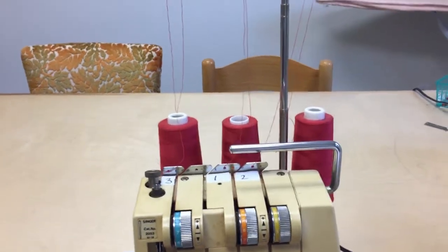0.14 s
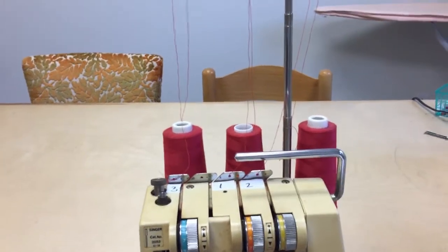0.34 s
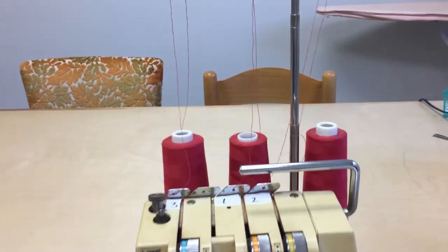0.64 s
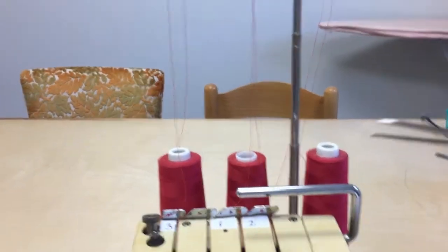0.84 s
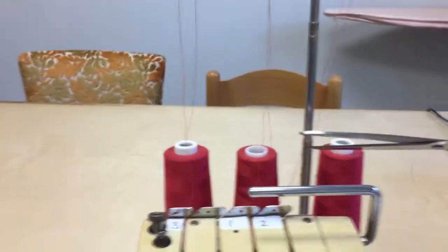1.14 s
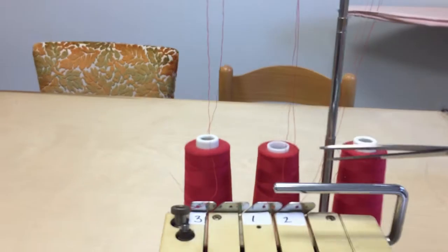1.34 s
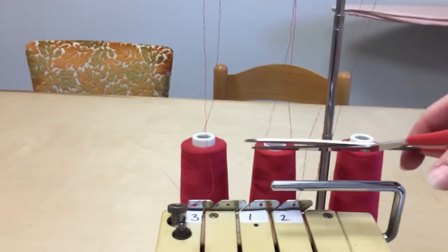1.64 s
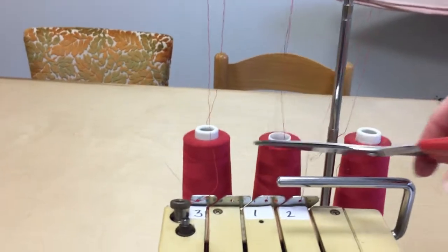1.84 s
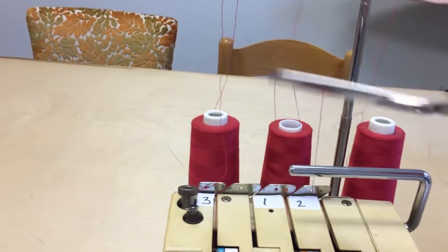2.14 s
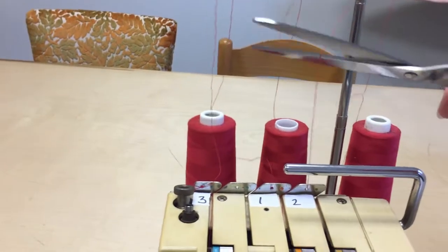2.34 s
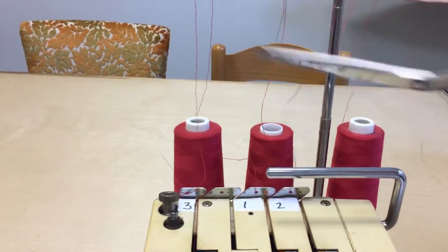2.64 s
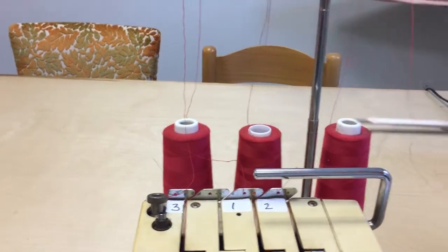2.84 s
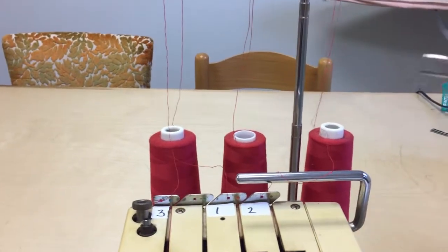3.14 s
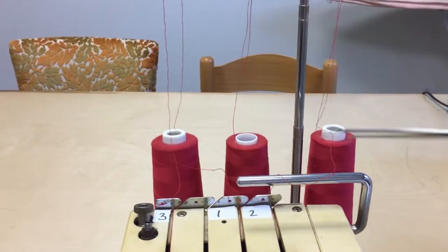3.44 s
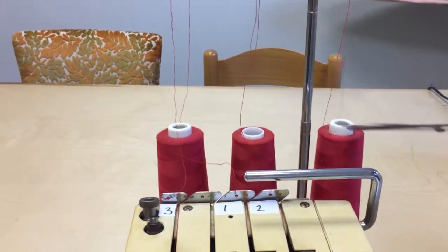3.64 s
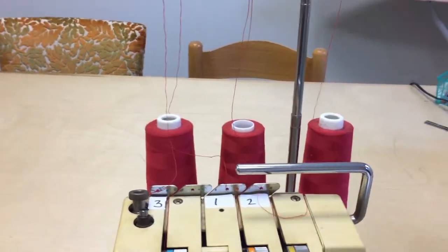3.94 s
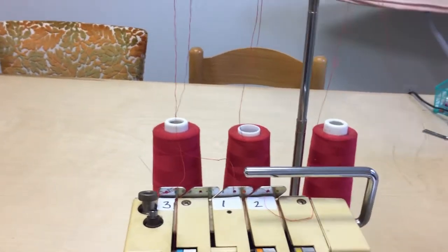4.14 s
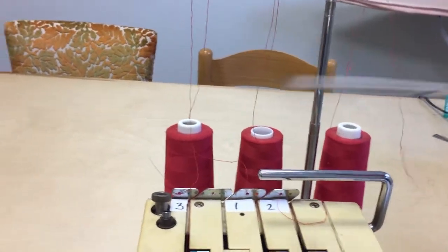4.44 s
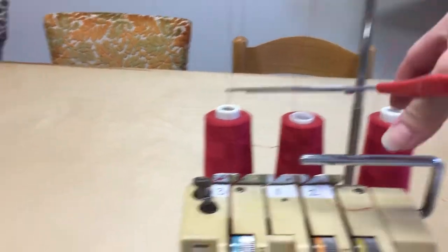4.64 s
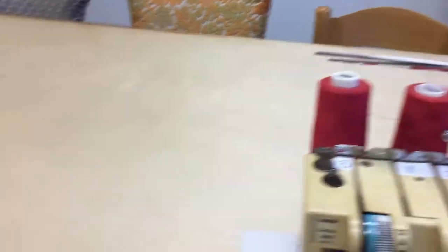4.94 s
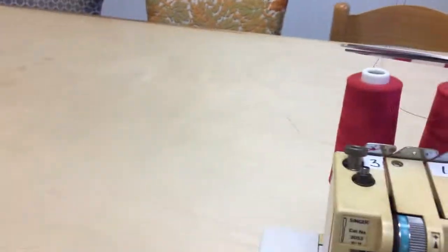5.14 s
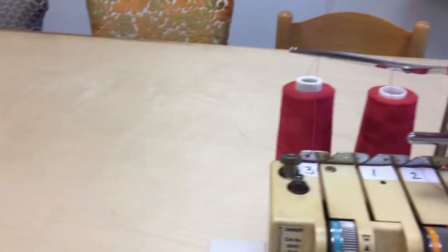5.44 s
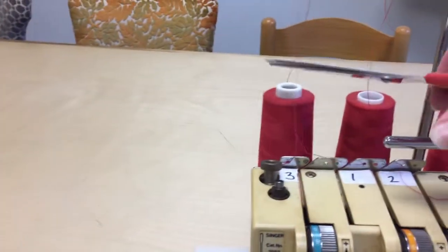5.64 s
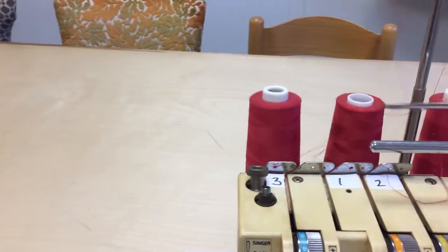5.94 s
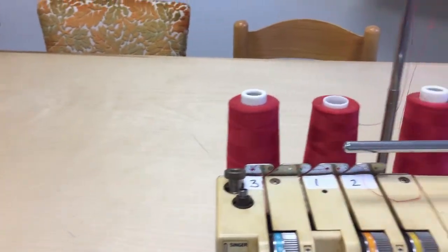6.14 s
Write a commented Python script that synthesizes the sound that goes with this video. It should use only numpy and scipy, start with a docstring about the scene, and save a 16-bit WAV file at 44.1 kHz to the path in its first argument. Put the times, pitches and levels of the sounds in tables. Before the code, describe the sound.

In a quiet, lightly echoing room, a low hum and uneven rumble run throughout. Cloth rustles briefly, scissors tick open, then dull wooden knocks sound farther off. Two crisp snips follow, their plastic grips snapping shut. The blades lightly strike a metal stand, pause, then snip more softly. A vehicle's low engine drone rises near the end, with dry plastic clacks. The microphone is close to the scissors.

```python
"""Steel scissors with plastic grips open and close on threads over a table in a quiet room.
Cloth rustles first: shaped noise. Blade ticks and rubbing ring the steel throughout; gliding noise is their song.
Something wooden is knocked from 1 to 2 s, while the hum sinks; the grips snap together from 2 to 3 s.
Near 4 s the blades strike the metal thread stand. From 5 s a vehicle (sines) draws near; at 6 s plastic clacks.
A humming appliance, a low rumble that comes and goes, and a faint steady noise of air lie under it all."""
import sys
import numpy as np
from scipy import signal
from scipy.fft import rfft, irfft
from scipy.io import wavfile

SR = 44100
rng = np.random.default_rng(int(sys.argv[2]) if len(sys.argv) > 2 else 0)


def int16_out(signal):
    """Quantize to a 16-bit WAV file."""
    q = np.round(np.clip(np.atleast_2d(signal).T, -1, 1) * 32767)
    wavfile.write(sys.argv[1], SR, q.astype(np.int16))


N = 277389

# blade ticks: t/s, force/dB, place of contact (0 pivot - 1 tips)
TICKS = [(0.376, -41, 0.525), (0.799, -30, 0.64), (0.811, -25.5, 0.62), (0.8233, -24.5, 0.73),
         (0.8282, -14.5, 0.89), (0.8505, -35.5, 0.555), (1.874, -31, 0.3), (1.935, -34, .1),
         (1.945, -39, 0.045), (2.102, -32, 0.81), (2.1061, -24, 0.74), (2.1187, -22.5, 0.79),
         (2.1646, -34.5, 0.58), (2.236, -36, 0.62), (2.269, -17.5, 0.812), (2.2747, -28, 0.26),
         (2.2934, -31, .03), (2.3105, -30, 0.95), (2.4205, -25, 0.75), (2.4252, -27, .75),
         (2.4304, -17, 0.88), (2.434, -12, 0.91), (2.4722, -37, .56), (2.687, -34, 0.61),
         (2.7135, -39, 0.73), (2.725, -40.5, .7), (2.7365, -18, 0.766), (2.745, -30.5, 0.76),
         (2.76, -23, 0.77), (2.903, -42.5, 0.11), (2.923, -27, 0.8), (2.935, -20, 0.85),
         (2.9436, -20.5, 0.82), (2.9748, -38, 0.61), (3.651, -44, 0.036), (3.7741, -32, 0.39),
         (3.7881, -38, 0.31), (3.8125, -30, .08), (3.824, -38, 0.05), (3.829, -34.5, 0.573),
         (3.959, -42, 0.47), (3.968, -30, 0.56), (3.9739, -27, 0.57), (3.9843, -25, 0.7),
         (3.988, -18, 0.84), (4.0217, -37, 0.53), (4.2171, -43, 0.56), (5.2235, -42, .03),
         (5.2498, -48, .03), (5.269, -49.5, .03), (5.296, -45.5, .03), (5.3105, -44, .03),
         (5.399, -26, 0.3), (5.411, -38, 0.43), (5.419, -32, 0.24), (5.4302, -30.5, 0.71),
         (5.525, -27, 0.37), (5.539, -33.5, 0.25), (5.554, -46, .03), (5.557, -40, .9),
         (5.5633, -35.5, 0.033), (5.573, -46, .03), (5.6545, -36, 0.058), (5.673, -20, .9),
         (5.6842, -22.5, 0.85), (5.6893, -22, 0.83), (5.7614, -28.5, 0.385), (5.7718, -33, 0.34),
         (5.7939, -32.5, 0.034)]
# ringing tones of the scissors: f/Hz, relative level/dB, time to fall 60 dB/s
SCISSORS_MODES = [(1452, -15.5, 0.015), (2055, -0.5, 0.019), (2235, -1, 0.01566), (2519, -8.5, 0.017),
                  (3650, -14.5, 0.012), (4004, -11, 0.0081), (5832, -6.5, 0.007), (6410, -3.5, 0.01036),
                  (7250, -9.5, 0.005), (9130, -4, 0.013), (11770, -14, 0.0048), (13800, -8, 0.007),
                  (15900, 0.5, 0.0051)]
# parts of the steel: low f/Hz, high f/Hz, place (0-1), tick loss over the whole blade/dB,
# level heard bare/dB, slips per s, how much sliding rings the modes/dB
STEEL_PARTS = [(1150, 4056, 0, 27.5, -18, 800, -1), (3100, 7900, 0.54, 39.5, -5, 1400, -0.5),
               (7700, 21300, 0.93, 29, -2.5, 1800, -14)]
# blades open: parting t/s, slide crest before it/s, slide length/s, pivot level/dB, edge level/dB,
# song before/dB, song after/dB, ring level/dB
OPENINGS = [(0.821, 0.013, 0.11, -63.5, -63, -57, -49.5, -57.5),
            (2.12, 0.011, 0.0504, -58, -46.5, -59, -70, -72),
            (2.433, 0.0057, 0.074, -59.5, -48, -58, -60, -63),
            (2.942, 0.01716, 0.05, -60.5, -47, -80, -61, -69.5),
            (3.986, 0.0024, 0.072, -61.5, -50, -77, -61, -61),
            (5.425, 0.018, 0.044, -66.5, -54.5, -62, -89, -83),
            (5.692, 0.017, 0.07, -62.5, -58, -70, -86, -70.5)]
# blades close: song start t/s, slide crest after it/s, slide length/s, pivot level/dB, edge level/dB,
# song length/s, song level/dB
CLOSINGS = [(1.936, 0.01545, 0.046, -61.5, -63, 0.0236, -65),
            (2.268, 0.028, 0.078, -60, -53.5, 0.0233, -53),
            (2.733, 0.036, 0.075, -59.5, -52, 0.0275, -49.5),
            (3.793, 0.031, 0.087, -63.5, -58.5, 0.033, -79), (5.223, 0.075, 0.12, -74, -98, 0.077, -80),
            (5.522, 0.042, 0.1, -68, -59, 0.036, -64), (5.754, 0.045, 0.11, -67.5, -61.5, 0.036, -65)]
# plastic grips meet: t/s, force/dB
SNAPS = [(1.974, -40), (2.3196, -13), (2.7811, -12)]
# blades strike the stand: t/s, drive level/dB, relative treble/dB, contact falls 60 dB in/s
STRIKES = [(3.8275, -45, -7, 0.023), (3.852, -49, 15.5, 0.02), (3.857, -41.5, 13.5, 0.0112),
           (3.8605, -33, -9, 0.0161), (3.867, -38, -18, 0.016), (3.902, -52, -12, 0.035)]
# ringing tones of the metal stand: f/Hz, relative level/dB, time to fall 60 dB/s
STAND_MODES = [(479, -15, 0.19), (575, -9.5, 0.077), (707, -5.5, 0.16), (1120, -2, 0.057),
               (1397, -4, 0.099), (1530, 6.5, 0.016), (1780, 1, 0.0086), (2227, -2.5, 0.062),
               (2620, -0.5, 0.018), (4000, 0.5, 0.039), (4950, -8.5, 0.0293), (6040, -20, 0.398),
               (7320, -2, 0.027), (12720, -4, 0.048), (14690, -23, 0.104)]
# dry clacks on a plastic housing: t/s, drive level/dB, relative treble/dB, contact falls 60 dB in/s
CLACKS = [(.105, -65, 11, 0.0094), (6.072, -44.5, -11, 0.51), (6.158, -37, -8.5, 0.015),
          (6.169, -28.5, -1, 0.015), (6.185, -48, 3, 0.21), (6.245, -42, -11, 0.074),
          (6.263, -33.5, -0.5, 0.025)]
# ringing tones of the plastic housing: f/Hz, relative level/dB, time to fall 60 dB/s
HOUSING_MODES = [(1110, -6, 0.012), (1530, 3.5, 0.0042), (2250, -4, 0.014), (3220, -3, 0.011),
                 (3780, -6, 0.011), (4540, 1, 0.0098), (5720, 2, 0.0088), (6900, 1.5, 0.0054)]
# dull knocks: t/s, drive level/dB, relative treble/dB, contact falls 60 dB in/s, push on the floor/dB
KNOCKS = [(1.058, -47, -22, 0.068, -50), (1.069, -26, -0.5, 0.033, -32), (1.0924, -30, -1, 0.0027, -57.5),
          (1.098, -40.5, 1, 0.43, -67), (1.379, -47, -16, 0.067, -66.5), (1.391, -27.5, -15, 0.03, -36.5),
          (1.405, -36, 1, 0.0069, -71), (1.5, -41, -18, 0.0056, -40), (1.544, -52.5, -13, 0.0134, -56),
          (1.723, -39.5, 0, 0.042, -59), (1.736, -46.5, 9.5, 0.25, -60)]
# ringing tones of the wood: f/Hz, relative level/dB, time to fall 60 dB/s
WOOD_MODES = [(382, -6.5, 0.0866), (524, 1.5, 0.031), (609, -0.5, 0.022), (720, -6, 0.015),
              (900, -4, 0.006), (1250, 5, 0.007), (1770, 1.5, 0.00512), (3250, -13, 0.0032)]
# low tones of the floor: f/Hz, relative level/dB, time to fall 60 dB/s
FLOOR_MODES = [(73, -8, 0.15), (215, 6, 0.0407)]
# cloth scuffs: crest t/s, body level/dB, treble level/dB, body swell/dB per s, body fade/dB per s
SCUFFS = [(.012, -63.5, -93.5, 299, 110), (.11, -64.5, -80, 1500, 79), (.17, -68.5, -91, 198, 400),
          (0.274, -51, -55.5, 501, 124), (0.337, -56.5, -70.5, 300, 301), (0.414, -75, -84, 400, 252)]
# colour of the cloth noise: f/Hz, relative level/dB per Hz
CLOTH_SPECTRUM = [(280, -27), (398, 2), (498, -11), (601, -3), (835, -24), (929, -3), (1120, -3.5),
                  (1450, -10.5), (1860, -2.5), (2250, -12), (2650, -8), (3500, -21), (4500, -19),
                  (5100, -27), (11000, -120)]
# engine loudness as the vehicle nears: t/s, level/dB
NEARING = [(4.95, -95), (5.3, -57.5), (5.63, -49.5), (5.8, -43), (6.0, -43.5), (6.15, -40.5), (6.29, -46)]
# engine tones: multiple of the firing rate, relative level idling/dB, relative level pulling/dB
ENGINE_ORDERS = [(1, -0.5, -16.5), (2, -22, 2.5), (3, -3.5, -14.5)]
# the hum sinks for a moment: t/s, change in level/dB
HUM_DIP = [(1.08, -1), (1.16, -11), (1.74, -8.5), (1.84, 1)]
# narrow wavering tones of the hum: f/Hz, width/Hz, level/dB
HUM_TONES = [(120.2, 15, -63), (260.8, 5.26, -70.5), (768, 4.3, -84)]
# loudness of the low rumble: t/s, level/dB
RUMBLE = [(0.0, -56), (0.49, -56.5), (1.21, -68.5), (2.05, -51.5), (3.71, -72), (4.01, -54), (4.2, -67),
          (5.32, -53.5), (5.46, -56.5), (6.29, -45.5)]
# colour of the low rumble: f/Hz, relative level/dB per Hz
RUMBLE_SPECTRUM = [(15, -71), (25, -64), (54, -10), (81, 3.5), (127, -6), (221, -13), (250, -9),
                   (320, -23.5), (550, -120)]
# colour of the air noise: f/Hz, relative level/dB per Hz
AIR_SPECTRUM = [(76, -31.5), (130, -6.5), (147, -19.5), (228, -22), (263, -32), (291, -25.5), (410, -28.5),
                (706, -34.5), (1100, -37.5), (2090, -39.5), (16000, -54)]
# how long the room rings: f/Hz, time to fall 60 dB/s
ROOM = [(100, 0.37), (700, 0.56), (1840, 0.2333), (4850, 0.22), (12000, 0.19)]

TICK_T60_S, TICK_RISE_S = 0.0039, 0.0008
TICK_VARIES_DB = 4.5   # each tick strikes each mode more or less
CLICK_DB = 8   # the hard first instant of a tick is what rings the modes
OPENING_BUILD, CLOSING_BUILD = 0.4444, 0.71   # share of a slide before its crest
MIDDLE_DB = -9   # mid-blade, relative to the mean of pivot and edge levels
SNAP_LOW_HZ, SNAP_HIGH_HZ = 650, 8900
SNAP_T60_S, SNAP_TAIL_DB = .008, 13.5   # the tail is set this far below the first click
# the free blade sings: pitch when shut, when parting and when wide open
SHUT_HZ, PARTING_HZ, OPEN_HZ = 15800, 9080, 7300
BEFORE_S, AFTER_S = 0.015, 0.025   # song time on each side of the parting
LEAD_S, LEAD_DB = .035, 17   # a lower song, fainter by LEAD_DB, leads into each closing
RING_HZ, RING_WIDTH_HZ, RING_T60_S = 9350, 1100, .3   # rough ring after parting
FIRST_TOUCH_DB = -17.5   # a 10 ms blow starts with a hard instant; longer contacts start softer
BOOM_LAG_S = 0.00624
TREBLE_STEEPER = 3.1   # cloth treble swells and fades this much faster than its body
IDLE_HZ, PULL_HZ, REV_HZ_PER_S = 58.7, 61.9, 11.7   # the engine idles, pulls, then keeps rising
PULL_S, PULL_TAKES_S = 5.68, 0.107
MAINS_HZ, MAINS_DB, MAINS_WAVERS_DB = 120.15, -56.5, 2   # the core of the hum
AIR_DB = -64.5
STOP_HZ = 16450   # from here up the cut is at least 70 dB


def scissors():
    """Ticks and rubbing drive three parts of the steel, heard partly bare and partly through ringing modes."""
    s, force_db, place = np.transpose(TICKS)
    varies_db = TICK_VARIES_DB * rng.standard_normal((len(s), len(SCISSORS_MODES)))
    humps, part_slide_db = slides()
    grip = from_db(4.5 * lumps(73) - 3.0)   # the edges stick and slip
    out = grip_snaps()
    for row, slide_db in zip(STEEL_PARTS, part_slide_db):
        low, high, part, loss_db, bare_db, slips, rings_db = row
        friction = from_db(slide_db) @ humps * grip * grains(slips, 2.3)
        friction *= np.sqrt(SR / (high - low))   # makes up for the narrow band
        tick_db = force_db - loss_db * np.abs(place - part)   # weaker away from the contact
        force = bursts(s, tick_db, TICK_T60_S, TICK_RISE_S) + friction
        rung = 0
        for (hz, db, t60), own_db in zip(SCISSORS_MODES, varies_db.T):
            if low <= hz < high:
                push = clicks(s, tick_db + own_db + CLICK_DB) + from_db(rings_db) * friction
                rung = rung + from_db(db - 20) * ring(push, hz, t60)
        bare = band(band(force, low, high), low, high)
        out = out + from_db(bare_db) * bare + band(rung, 0.97 * low, 16600)
    return out + singing_blades()


def slides():
    """Each opening or closing rubs the edges: pressure rises to a crest and falls; levels for three parts."""
    rows = [(s - lead, length, pivot, edge, OPENING_BUILD) for s, lead, length, pivot, edge, *_ in OPENINGS]
    rows += [(s + lag, length, pivot, edge, CLOSING_BUILD) for s, lag, length, pivot, edge, *_ in CLOSINGS]
    t = np.arange(N) / SR
    humps = np.array([np.interp(t, [at - build * length, at, at + (1 - build) * length], [0, 1, 0])
                      for at, length, _, _, build in rows])
    _, _, pivot_db, edge_db, _ = np.transpose(rows)
    return humps, [pivot_db, (pivot_db + edge_db) / 2 + MIDDLE_DB, edge_db]


def grip_snaps():
    """The plastic grips meet: a click, then a short rough contact, both kept to a middle band."""
    s, force_db = np.transpose(SNAPS)
    tail = bursts(s + 0.00029, force_db - SNAP_TAIL_DB, SNAP_T60_S, rise_s=.0001)
    return band(band(clicks(s, force_db) + tail, SNAP_LOW_HZ, SNAP_HIGH_HZ), 400, 8800)


def singing_blades():
    """The free blade's song falls on opening and rises on closing; parting leaves a rough dying ring."""
    out, t = np.zeros(N), np.arange(N) / SR
    glides = [(start, length, PARTING_HZ, SHUT_HZ, db) for start, *_, length, db in CLOSINGS]
    glides += [(start - LEAD_S, LEAD_S, OPEN_HZ, PARTING_HZ, db - LEAD_DB) for start, *_, db in CLOSINGS]
    for s, *_, before_db, after_db, _ in OPENINGS:
        glides.append((s - BEFORE_S, BEFORE_S, SHUT_HZ, PARTING_HZ, before_db))
        glides.append((s, AFTER_S, PARTING_HZ, OPEN_HZ, after_db))
    for start, length, start_hz, end_hz, db in glides:
        at, hz = round(start * SR), np.geomspace(start_hz, end_hz, round(length * SR))
        swell = np.sqrt(np.hanning(len(hz)))
        out[at:at + len(hz)] += from_db(db) * swell * narrow_noise(hz, width_hz=250)
    out *= from_db(-14 * np.maximum(lumps(60) + .3, 0))   # uneven grip breaks the tone into patches
    dying = sum(from_db(db - 60 * np.abs(t - s) / RING_T60_S) * (t >= s) for s, *_, db in OPENINGS)
    ring_hz = RING_HZ * (1 + .03 * lumps(4))   # the pitch of the ring wanders
    rings = narrow_noise(ring_hz, RING_WIDTH_HZ) + narrow_noise(1.49 * ring_hz, RING_WIDTH_HZ) / 2
    return out + dying * rings


def stand_strikes():
    """Blades hit the metal stand, whose modes ring on after a rough contact."""
    return struck(STRIKES, STAND_MODES, floor_hz=437, split_hz=2590, rise_s=0.0035, ring_db=4.0, crack_db=27.0)


def housing_clacks():
    """Blows on a plastic housing, whose modes die within milliseconds."""
    return struck(CLACKS, HOUSING_MODES, floor_hz=770, split_hz=1820, rise_s=0.0016, ring_db=4.5, crack_db=16.0)


def wooden_knocks():
    """Blows ring the wood and push the floor; distance dulls both."""
    wood = struck(KNOCKS, WOOD_MODES, floor_hz=347, split_hz=1210, rise_s=0.0013, ring_db=5.0, crack_db=-10.0)
    return signal.sosfilt(signal.butter(2, 4500, fs=SR, output="sos"), wood + booms())


def booms():
    """Soft pushes into the low modes of the floor, just after each knock."""
    pushes = clicks([s + BOOM_LAG_S for s, *_ in KNOCKS], [db for *_, db in KNOCKS])
    soft = signal.lfilter(*signal.butter(2, 300, fs=SR), pushes + 1e-18)
    return sum(from_db(db) * ring(soft, hz, t60) for hz, db, t60 in FLOOR_MODES)


def rustle():
    """Cloth dragged over cloth: uneven scuffing with a bright crest."""
    t, body, treble = np.arange(N) / SR, 0, 0
    for crest, db, treble_db, swell, fade in SCUFFS:
        below_db = np.maximum(np.where(t < crest, swell * (t - crest), fade * (crest - t)), -100)
        body = body + from_db(db + below_db)
        treble = treble + from_db(treble_db + TREBLE_STEEPER * below_db)
    crackle = from_db(3.2 * lumps(35) + 1.3 * lumps(300))
    bright = crackle * rms_one(band(grains(5200, 1.6), 2300, 11900))
    return body * crackle * coloured(CLOTH_SPECTRUM) + treble * bright


def vehicle():
    """Engine tones are sines at multiples of the firing rate; under load the second one takes over."""
    t = np.arange(N) / SR
    load = np.clip((t - PULL_S) / PULL_TAKES_S, 0, 1)
    hz = IDLE_HZ + load * (PULL_HZ - IDLE_HZ)
    hz += REV_HZ_PER_S * np.maximum(t - PULL_S - PULL_TAKES_S, 0)
    phase = 2 * np.pi * np.cumsum(hz) / SR
    orders = sum(from_db(idle_db + load * (pull_db - idle_db)) * np.sin(k * phase)
                 for k, idle_db, pull_db in ENGINE_ORDERS)
    return np.sqrt(2) * from_db(in_time(NEARING)[0]) * orders


def hum():
    """An appliance: a sine that wavers a little, and noise through narrow resonances that swells and fades."""
    core_db = MAINS_DB + in_time(HUM_DIP, outside=0)[0] + MAINS_WAVERS_DB * lumps(2.85)
    core = np.sqrt(2) * from_db(core_db) * np.sin(2 * np.pi * MAINS_HZ * np.arange(N) / SR)
    for hz, width, db in HUM_TONES:
        t60 = np.log(1000) / (np.pi * width)   # a narrower tone rings longer
        core = core + from_db(db) * rms_one(ring(rng.standard_normal(N), hz, t60))
    return core


def rumble():
    """Low coloured noise whose level comes and goes."""
    return from_db(in_time(RUMBLE, outside=None)[0]) * coloured(RUMBLE_SPECTRUM)


def air():
    """Steady coloured noise, strongest in the bass."""
    return from_db(AIR_DB) * coloured(AIR_SPECTRUM)


def room(x):
    """Echoes blur into octave bands of noise that fade in over 1.7 ms and die at their own rates."""
    t, tail = np.arange(SR // 2) / SR, 0
    for hz in 110 * 2. ** np.arange(8):
        if hz < 15000:
            noise = band(rng.standard_normal(len(t)), hz / np.sqrt(2), hz * np.sqrt(2))
            tail = tail + noise * from_db(-60 * t / at_hz(ROOM, hz))
    tail *= np.clip(t / 0.0017, 0, 1) / np.sqrt(SR)
    return signal.fftconvolve(x, tail)[:N]


def struck(events, modes, floor_hz, split_hz, rise_s, ring_db, crack_db):
    """Each blow is a short rough contact; it rings the modes, the high ones by the treble column, and cracks."""
    low, high = 0, 0
    for s, level, treble, contact_s, *_ in events:
        contact = signal.lfilter([1], [1, -.6], bursts([s], [level], contact_s, rise_s))
        contact = contact / np.sqrt(contact_s * SR)
        touch_db = level + FIRST_TOUCH_DB + 20 * np.log10(.01 / contact_s)
        contact = contact + clicks([s + rise_s], [touch_db])
        low, high = low + contact, high + from_db(treble) * contact
    low = band(low, floor_hz, 1.8 * split_hz)   # the low modes take up neither deep bass nor treble
    rung = sum(from_db(db + ring_db) * ring(high if hz > split_hz else low, hz, t60) for hz, db, t60 in modes)
    thin = signal.sosfilt(signal.butter(2, floor_hz, "high", fs=SR, output="sos"), rung)
    crack = band(band(high, split_hz, 3.33 * split_hz), split_hz / 2, 8.2 * split_hz)
    return thin + from_db(crack_db) * crack


def bursts(times, levels_db, t60, rise_s):
    """Contacts: rough force that builds in about rise_s and dies in t60."""
    lag = np.exp(-1 / (rise_s * SR))
    dying = signal.lfilter([1], [1, -from_db(-60 / (t60 * SR))], clicks(times, levels_db) + 1e-18)
    return signal.lfilter([1 - lag], [1, -lag], dying) * rng.choice([-1, 1], N)


def clicks(times, levels_db):
    """Single-sample pushes."""
    out = np.zeros(N)
    out[np.round(np.asarray(times) * SR).astype(int)] = from_db(levels_db)
    return out


def ring(x, hz, t60):
    """A unit click sets a dying sine of starting height 1 ringing."""
    r, w = from_db(-60 / (t60 * SR)), 2 * np.pi * hz / SR
    return signal.lfilter([0, np.sin(w)], [1, -2 * r * np.cos(w), r * r], x + 1e-18)


def grains(per_s, spread_db):
    """Many uneven tiny slips at random moments; rms 1."""
    sizes = from_db(spread_db * np.minimum(rng.exponential(1, N), 5)) * rng.choice([-1, 1], N)
    return rms_one(sizes * (rng.random(N) < per_s / SR))


def narrow_noise(hz, width_hz):
    """A rough tone: slow noise carried on a moving pitch."""
    slow = signal.lfilter(*signal.butter(2, width_hz / SR), rng.standard_normal((2, len(hz) + 500)))
    slow = slow[:, 500:]   # skip the filter's start
    phase = 2 * np.pi * np.cumsum(hz) / SR
    return (slow[0] * np.cos(phase) + slow[1] * np.sin(phase)) * np.sqrt(2 * SR / width_hz)


def lumps(per_s):
    """Slow random ups and downs; rms 1."""
    r = np.exp(-2 * np.pi * per_s / SR)
    return rms_one(signal.lfilter([1], [1, -2 * r, r * r], rng.standard_normal(N)))


def coloured(spectrum):
    """Noise with a given spectrum; rms 1."""
    hz = np.maximum(np.fft.rfftfreq(N, 1 / SR), 1)
    inside = (hz >= spectrum[0][0]) & (hz <= spectrum[-1][0])
    return rms_one(irfft(rfft(rng.standard_normal(N)) * from_db(at_hz(spectrum, hz)) * inside, N))


def band(x, low_hz, high_hz):
    """Keeps the sound between two frequencies."""
    return signal.sosfilt(signal.butter(2, [low_hz, high_hz], "band", fs=SR, output="sos"), x + 1e-18)


def in_time(rows, outside=-120):
    """Columns of a curve, sample by sample; None holds the end values."""
    s, *columns = np.transpose(rows)
    return np.array([np.interp(np.arange(N) / SR, s, c, outside, outside) for c in columns])


def at_hz(points, hz):
    """A curve read on a log-frequency axis."""
    return np.interp(np.log(hz), np.log(np.array(points)[:, 0]), np.array(points)[:, 1])


def rms_one(x):
    """Scaled to rms 1."""
    return x / np.sqrt(np.mean(x ** 2) + 1e-20)


def from_db(db):
    """Gain of a level."""
    return 10 ** (np.asarray(db) / 20)


def scene():
    """Every source is heard directly; the steel sends the least to the room, the cloth the most."""
    steel, cloth = scissors(), rustle()
    hard = stand_strikes() + housing_clacks()
    far = wooden_knocks()
    wet = room(from_db(6.0) * steel + from_db(10.0) * hard + from_db(11.0) * far + from_db(12.0) * cloth)
    background = vehicle() + hum() + rumble() + air()   # these skip the room echo
    return (steel + hard + far + cloth + wet + background)[None]


def record(dry):
    """The microphone drops the deep bass; the top is cut steeply."""
    thin = signal.sosfilt(signal.butter(3, 45, "high", fs=SR, output="sos"), dry)
    return signal.sosfilt(signal.cheby2(14, 70, STOP_HZ, fs=SR, output="sos"), thin)


dry = scene()
out = record(dry)
int16_out(out)
```